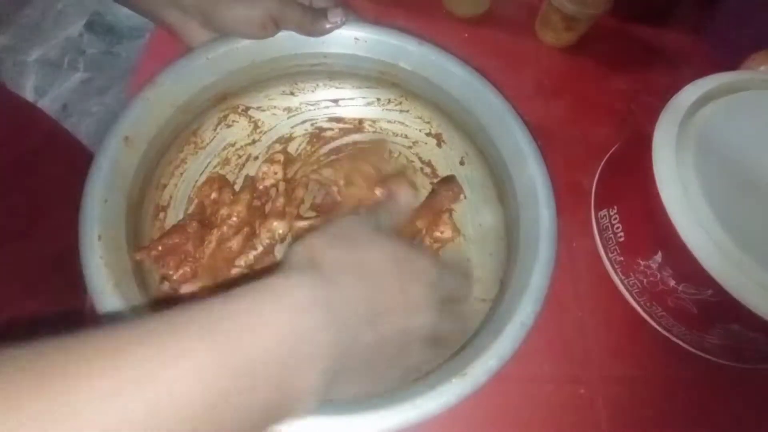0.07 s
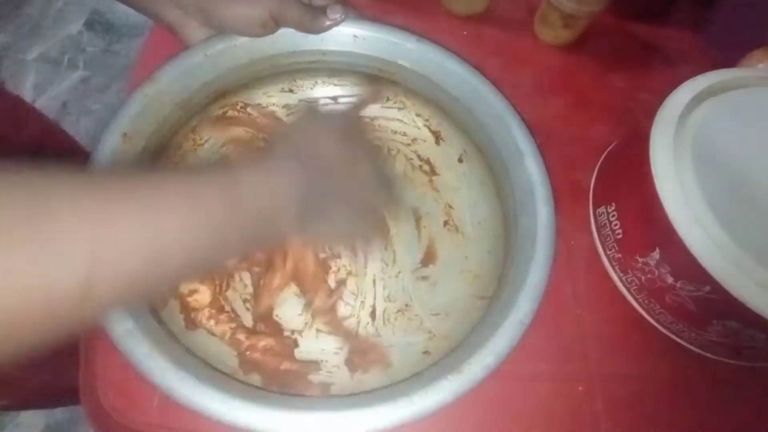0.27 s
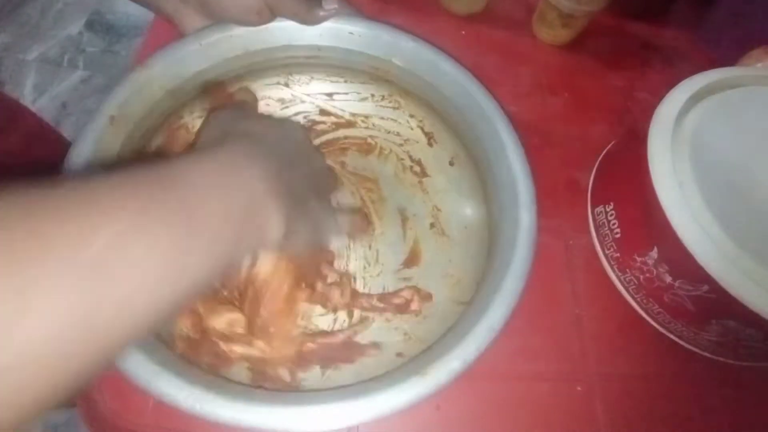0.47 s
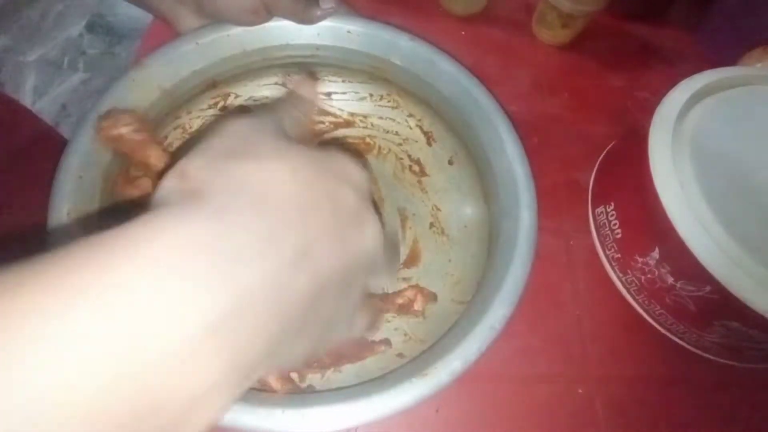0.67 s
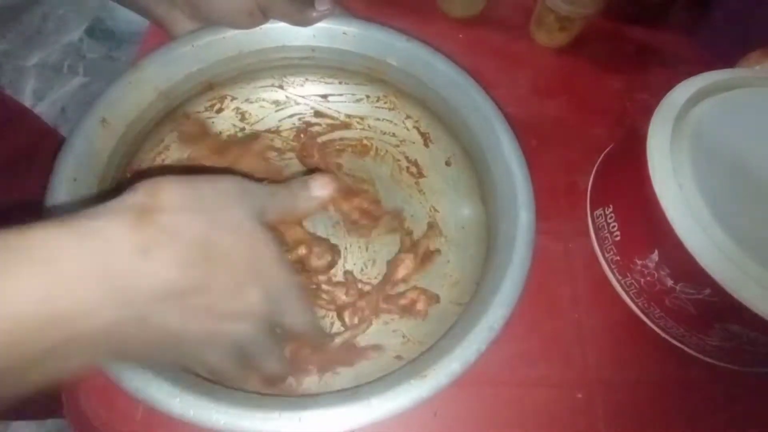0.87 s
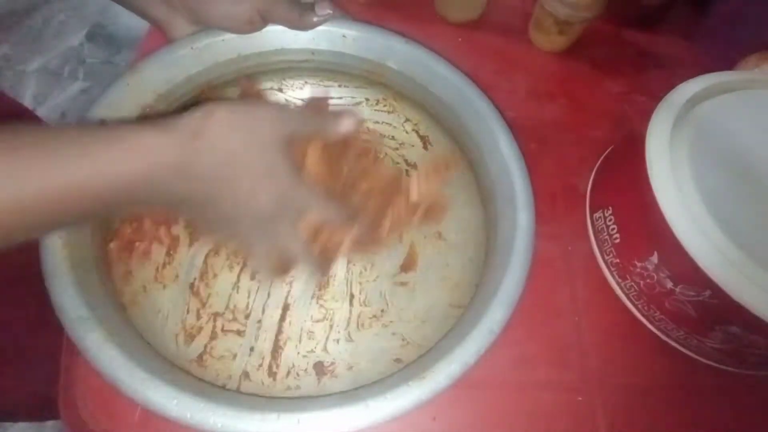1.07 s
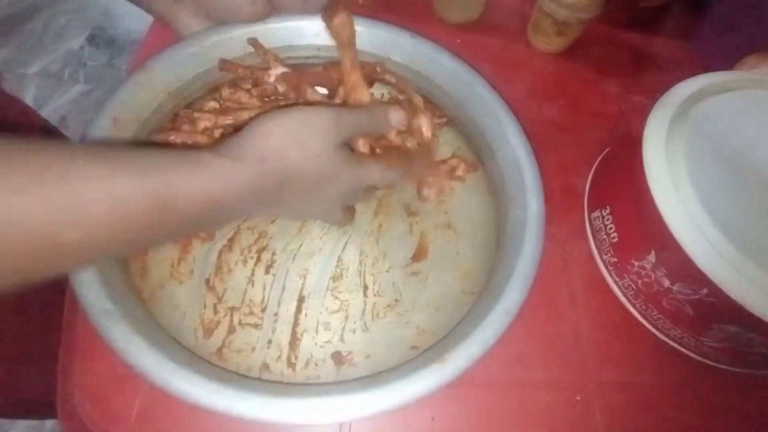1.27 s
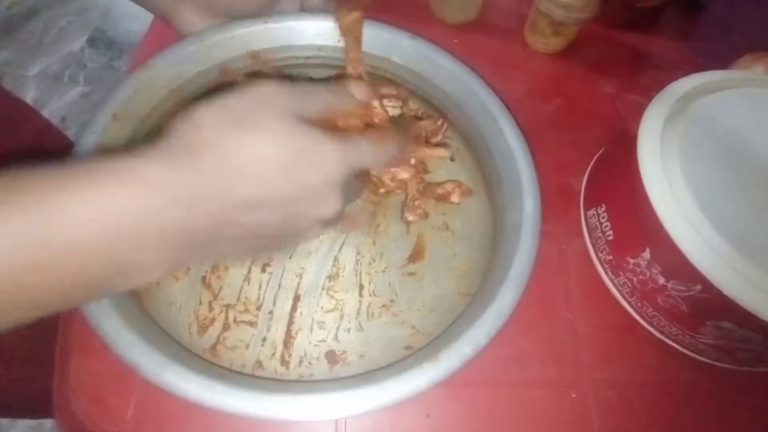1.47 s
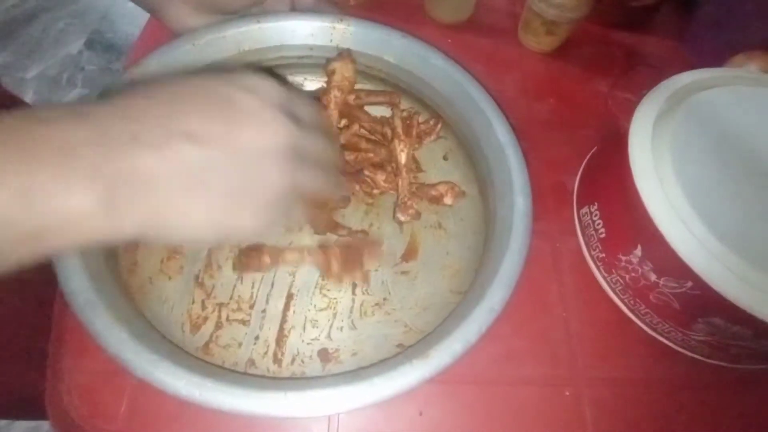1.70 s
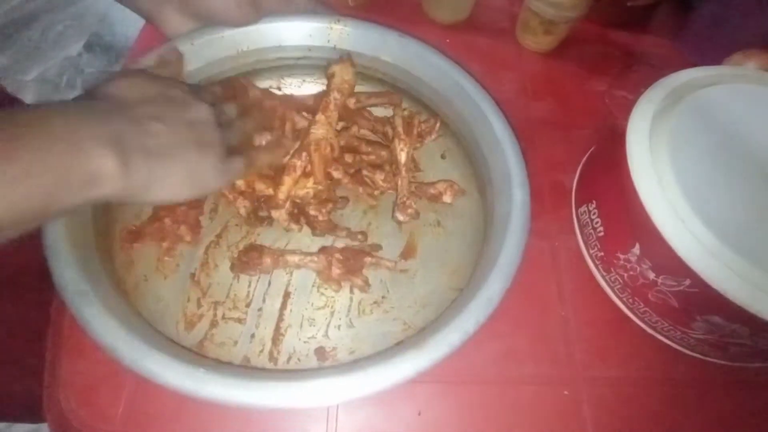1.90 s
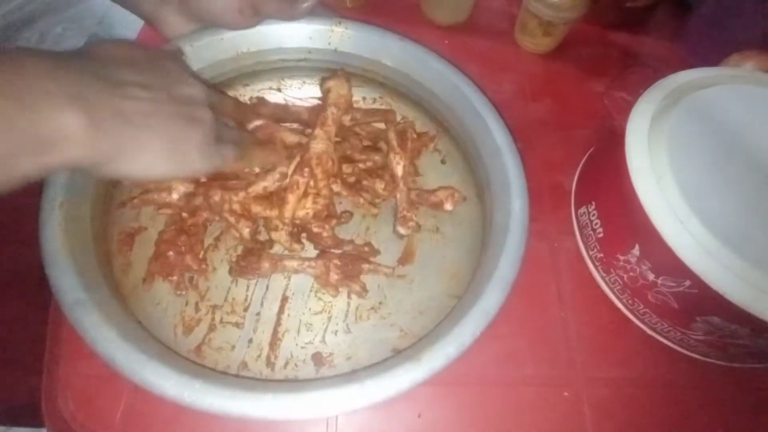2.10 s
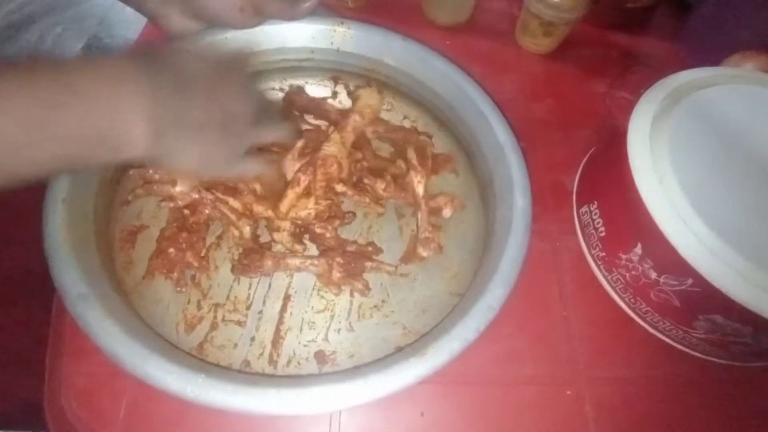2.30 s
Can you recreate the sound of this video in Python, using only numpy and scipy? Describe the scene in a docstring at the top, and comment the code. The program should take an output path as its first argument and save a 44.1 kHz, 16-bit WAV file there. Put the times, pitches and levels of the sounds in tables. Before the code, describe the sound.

Saucy chicken pieces squish and knock around a metal pan, with a few brief squeaks.

```python
"""A hand turns sauce-coated chicken feet in a wide aluminium pan on a plastic table.
First the wet pieces swish over the metal and knock against it, while the pan rocks and booms.
Just past one second its bottom catches and squeaks. After a lull come more knocks and booms,
then a drag across the table ends in a cluster of short squeaks and a last swish.
Throughout, a small, hard-walled kitchen rings after the knocks, swishes and squeaks."""
import sys
import numpy as np
from scipy import signal
from scipy.fft import rfft, irfft
from scipy.io import wavfile
from scipy.ndimage import uniform_filter1d

SR = 44100
rng = np.random.default_rng(int(sys.argv[2]) if len(sys.argv) > 2 else 0)


def store_pcm(level_fs):
    """Save levels as 16-bit WAV."""
    pcm = np.round(np.clip(level_fs, -1, 1) * 32767).astype(np.int16)
    wavfile.write(sys.argv[1], SR, np.atleast_2d(pcm).T)


N = 108045

# hits of food, hand and pan, levels relative to KNOCK_DB
# (time [s], contact [s], rim send [dB], room send [dB], level in each of the five bands [dB])
KNOCK_HITS = [(.257, 0.0058, 6, -1, -57, -58, -35.5, -41, -40.5),
              (0.3356, 0.0052, 6, 1.5, -41.5, -49.5, -31, -27.5, -27),
              (0.5465, 0.006, 9, -6.5, -39, -46.5, -43, -36.5, -47),
              (0.6272, 0.0021, -1.5, 1.5, -29, -35, -22.5, -35, -51),
              (.729, 0.003, -4, -1, -60, -34, -40, -48, -69),
              (0.7861, 0.00089, -8.5, -2, -24.5, -16.5, -37.5, -52.5, -46),
              (0.8225, 0.001, -1, 1.5, -50, -33, -64, -55, -46),
              (0.847, 0.0089, -14, 2.5, -48, -55, -54, -39, -69),
              (1.0317, 0.0014, -1.5, -2, -29, -20.5, -23.5, -28, -59),
              (1.394, 0.01, 7, 1, -75.5, -42, -50, -51.5, -62),
              (1.516, 0.014, 5, -0.5, -61, -41.5, -55, -56, -66.5),
              (1.592, 0.0009, -8, -1, -50, -31, -39.5, -71, -95),
              (1.6481, 0.0029, -17, -1.5, -45, -28, -26, -25.5, -39),
              (1.8919, 0.0057, 3.5, 5, -45.5, -53, -43.5, -41, -45.5),
              (2.027, 0.0023, -3, -3.5, -28.5, -49, -58, -74, -80),
              (2.1669, 0.002, -27, -5, -40.5, -30, -59.5, -59, -67),
              (2.2191, 0.001, -4, -3, -33, -34.5, -54, -35, -43)]
# EQ bands of a knock (low edge [Hz], high edge [Hz])
KNOCK_EQ_BANDS = [(100, 300), (300, 900), (900, 2000), (2000, 4500), (4500, 9000)]
# broad pan resonances that colour every knock (frequency [Hz], gain [dB])
PAN_EQ = [(100, 5), (140, 2), (240, -1), (400, 2), (600, 1.5), (780, -2.5), (980, 0.5), (1200, -5.5),
          (1500, 2), (1750, -3), (2400, 4.5), (3100, -2), (3750, 1.5), (4600, -1.5), (6500, 2), (7800, -3)]
# strokes through the sauce (start [s], peak [s], end [s], level [dB], tilt [dB/octave])
SAUCE_STROKES = [(0.084, 0.085, 0.15, -52.5, 7), (0.118, 0.157, 0.18, -40.5, -1.5),
                 (0.151, 0.233, 0.47, -40.5, 0), (0.267, 0.287, 0.32, -31, 8),
                 (0.308, 0.39, 0.74, -45.5, -0.5), (0.78, 0.933, 1.045, -46.5, 3.7),
                 (0.919, 1.045, 1.4, -41.5, 1.3), (1.137, 1.169, 1.177, -31.5, 1),
                 (1.145, 1.202, 1.346, -44, -2.5), (1.32, 1.413, 1.546, -47.5, -1.5),
                 (1.498, 1.545, 1.599, -59, 2.5), (1.644, 1.702, 1.796, -50.5, 1),
                 (1.897, 1.956, 2.136, -46.5, -1.5), (2.17, 2.204, 2.265, -38.5, 3),
                 (2.226, 2.298, 2.394, -49.5, 1)]
# colour of the wet swish (frequency [Hz], gain [dB])
SWISH_EQ = [(60, -17.5), (130, -9.5), (300, -1), (600, -2.5), (1000, -7.5), (1700, 1), (2700, 6),
            (4500, -2.5), (6500, -4), (7800, -14), (9300, -14), (11000, -27), (14000, -40), (15500, -25.5)]
# colour of a snapping sauce thread (frequency [Hz], gain [dB])
TICK_EQ = [(800, -10), (3000, -17), (7000, 10), (11000, 0.5), (15000, 4)]
# sauce lets go with a wet smack (time [s], level [dB])
SAUCE_SMACKS = [(.139, -48), (.16, -45), (0.293, -34), (.404, -46), (.67, -59), (.735, -56), (.965, -53),
                (1.143, -44), (1.727, -63), (1.968, -56)]
# the pan's bottom catches (start [s], peak [s], end [s], level [dB], main tone [Hz], upper tone [Hz])
SQUEAKS = [(1.1434, 1.1655, 1.186, -24.5, 2680, 3880), (2.18, 2.191, 2.198, -38.5, 2500, 3900),
           (2.196, 2.201, 2.207, -29.5, 2610, 4170), (2.205, 2.211, 2.238, -38, 4890, 5850),
           (2.2195, 2.2222, 2.227, -25, 2460, 3720)]
# resonances of the rasp under a squeak (frequency [Hz], width [Hz], gain [dB])
RASP_PEAKS = [(486, 87, -15), (924, 39, 3), (2520, 290, -4.5), (3840, 590, -2.5), (6640, 900, -10.5)]
# the pan rocks on the table (time [s], level relative to BUMP_DB [dB])
TABLE_BUMPS = [(0.142, -27), (0.274, -25.5), (0.331, -27.5), (0.633, -19.5), (0.791, -19.5), (0.952, -32.5),
               (1.041, -17), (1.595, -22), (1.731, -22), (1.91, -18), (2.03, -25), (2.214, -24.5)]
# fader curve of the dragged pan's rumble (time [s], gain [dB])
DRAG_FADER = [(0, -51), (.2, -61), (.42, -48), (0.549, -68.5), (.8, -48), (1.151, -47), (1.28, -65.5),
              (1.56, -80.5), (1.62, -58), (1.76, -60), (1.86, -61), (2.1, -43), (2.28, -51), (2.36, -60)]
# modes of the pan's bottom on the table (frequency [Hz], gain [dB], t60 [s])
BOTTOM_MODES = [(74, -12, .45), (95, -9, .45), (137.5, 1, .42), (153, -5, .25), (195, -8, .4),
                (302, -10, .45), (371, -16, .4)]
# modes of the pan's wall and rim, hollow to thin and bright (frequency [Hz], gain [dB], t60 [s])
RIM_MODES = [(458, -4, .4), (549, -6, .6), (610, 0, .6), (834, -9, .6), (931, 1, .6), (1223, -7, .4),
             (1546, 0, .45), (1830, -7, .45), (2402, 4, .65), (2794, -3, .3), (2993, -9, .6),
             (3801, -11, .45), (6227, -12, .35)]
# kitchen reverb tail (frequency [Hz], t60 [s], gain [dB])
REVERB_BANDS = [(85, 1, -7), (199, 0.32, -1), (530, 0.6, 0.5), (1360, 0.64, -4.5), (2980, 0.54, -6.5),
                (7000, 0.53, -7), (11100, 0.18, -31)]
# colour of the room tone (frequency [Hz], gain [dB])
ROOM_TONE_EQ = [(30, -53), (70, -27), (125, -4.5), (250, -12), (550, -6), (800, -27), (1200, -17.5),
                (2500, -16), (5000, -27.5), (10000, -45), (16000, -56)]

KNOCK_DB, RATTLE_GAIN, ATTACK_S, BASS_ROLLOFF_DB, TOP_ROLLOFF_DB = -22, 1.63, .0008, -35.5, -21.5
STROKE_EDGE_DB, GRAINS_PER_S, GRAIN_SPREAD_DB, HISS_GAIN = 17.5, 2000, 2, 0.54
STICK_DB, STICKS_PER_S = 3, 83
TICKS_PER_S, TICK_DB, TICK_SPREAD_DB = 200, -24, .8
SMACK_RISE_S, SMACK_FALL_S = 0.0015, 0.0044
SCRAPE_EDGE_DB, SLIPS_PER_S, RASP_TOP_HZ, RASP_DB = 16, 2100, 6440, -3.5
UPPER_TONE_DB, WAVER_DEPTH, WAVERS_PER_S, SQUEAK_ROUGH_DB = -6, 0.027, 650, 2
BUMP_DB, BUMP_PUSH_S, JUDDER_TOP_HZ = -16.5, 0.00482, 270
BOTTOM_DB, RIM_DB, SAUCE_TO_RIM_DB = -51.5, -53, -18
EARLY_DB, EARLY_DECAY_S, PREDELAY_S, ROOM_TONE_DB = -5, 0.014, 0.00237, -59
LOW_CUT_HZ, HIGH_CUT_HZ = 72.4, 15900


def knocks():
    """Each hit is a push and a brief rattle; returns the dry hits, the room send and the rim send."""
    hits, room_send, rim_send = np.zeros((3, N))
    t = np.arange(SR // 16) / SR
    low, high = np.array(KNOCK_EQ_BANDS, float).T
    centres, pan = np.sqrt(low * high), colour(PAN_EQ)
    for time, contact, rim_db, room_db, *band_db in KNOCK_HITS:
        push = rng.standard_normal(len(t)) * np.minimum(t / ATTACK_S, 1)
        push *= np.exp(-(t / contact) ** 2 / 2)
        push *= RATTLE_GAIN * contact / 0.0019 / np.linalg.norm(push)  # longer contact, more rattle
        push[int(ATTACK_S * SR)] += 1  # the clean transient
        db = np.array(band_db) - 10 * np.log10((high - low) / (SR / 2))  # spread over each band's width
        body = colour([(40, db[0] + BASS_ROLLOFF_DB), *zip(centres, db),
                       (13000, db[-1] + TOP_ROLLOFF_DB)])
        blow = convolve(push, body)
        blow *= undb(KNOCK_DB) * np.sqrt(SR) * np.linalg.norm(body) / np.linalg.norm(blow)
        hit = convolve(blow, pan)
        add(hits, time, hit)
        add(room_send, time, hit * undb(room_db))
        add(rim_send, time, body * np.sqrt(SR) * undb(KNOCK_DB + rim_db))
    return hits, room_send, rim_send


def swish():
    """Sauce films part in countless small clicks as the pieces stick and slide; threads snap on top."""
    wet = grains(GRAINS_PER_S, GRAIN_SPREAD_DB) + HISS_GAIN * rng.standard_normal(N)
    wet *= undb(STICK_DB * wander(STICKS_PER_S))
    ticks = undb(TICK_DB) * unit(convolve(grains(TICKS_PER_S, TICK_SPREAD_DB), colour(TICK_EQ)))
    out = np.zeros(N)
    for start, peak, end, db, tilt in SAUCE_STROKES:
        eq = colour([(hz, gain + tilt * np.log2(hz / 2500)) for hz, gain in SWISH_EQ])
        out += undb(db) * swell(start, peak, end, STROKE_EDGE_DB) * (unit(convolve(wet, eq)) + ticks)
    return out


def smacks():
    """Short, bright crackles where a piece pulls free of the sauce."""
    crackle = unit(convolve(grains(GRAINS_PER_S, GRAIN_SPREAD_DB), colour(TICK_EQ)))
    return crackle * sum(undb(db) * swell(time - SMACK_RISE_S, time, time + SMACK_FALL_S, STROKE_EDGE_DB)
                         for time, db in SAUCE_SMACKS)


def scrapes():
    """Each slide locks onto two tones of the pan, over a rasp of stick-slip clicks."""
    slips = grains(SLIPS_PER_S, GRAIN_SPREAD_DB) + rng.standard_normal(N)
    rasp = sum(undb(db) * signal.lfilter(*signal.iirpeak(hz, hz / width, fs=SR), slips)
               for hz, width, db in RASP_PEAKS)
    rasp = undb(RASP_DB) * unit(lowpass(rasp, 4, RASP_TOP_HZ))
    out = np.zeros(N)
    for start, peak, end, db, hz, upper_hz in SQUEAKS:
        tones = squeak(hz) + undb(UPPER_TONE_DB) * squeak(upper_hz)
        out += undb(db) * swell(start, peak, end, SCRAPE_EDGE_DB) * unit(tones + rasp)
    return out


def squeak(hz):
    """A friction tone, unsteady in pitch and level."""
    pitch = hz * (1 + WAVER_DEPTH * wander(WAVERS_PER_S))
    phase = 2 * np.pi * np.cumsum(pitch) / SR
    return unit(np.sin(phase) * undb(SQUEAK_ROUGH_DB * wander(WAVERS_PER_S)))


def bumps():
    """Soft pushes on the table make the pan's bottom boom."""
    pushes, push = np.zeros(N), np.hanning(int(BUMP_PUSH_S * SR))
    for time, db in TABLE_BUMPS:
        add(pushes, time, undb(db + BUMP_DB) * push / push.sum())
    return convolve(pushes, ring(BOTTOM_MODES))


def rumble():
    """The pan judders as the hand drags it on the table."""
    times, db = np.array(DRAG_FADER).T
    fader = undb(np.interp(np.arange(N) / SR, times, db))
    judder = lowpass(rng.standard_normal(N), 2, JUDDER_TOP_HZ)
    body = ring(BOTTOM_MODES)
    return convolve(fader * judder, body / np.linalg.norm(body))


def kitchen(send):
    """Hard walls return close reflections and a diffuse tail with its own decay in each band."""
    t = np.arange(SR) / SR
    spectrum, log_f = rfft(rng.standard_normal(SR)), np.log(np.arange(SR // 2 + 1) + 1)
    centres = np.array(REVERB_BANDS)[:, 0]
    response = rng.standard_normal(SR) * np.exp(-t / EARLY_DECAY_S) * (t > PREDELAY_S)
    response *= undb(EARLY_DB) / np.linalg.norm(response)
    for share, (_, t60, db) in zip(np.eye(len(REVERB_BANDS)), REVERB_BANDS):
        band = irfft(spectrum * np.interp(log_f, np.log(centres), share))
        fade = np.exp(-np.log(1000) * t / t60) * (t > PREDELAY_S)
        response += undb(db) * band * fade / np.linalg.norm(fade)
    return convolve(send, response)


def room_tone():
    """A faint, steady bed of dark noise."""
    return undb(ROOM_TONE_DB) * unit(convolve(rng.standard_normal(N), colour(ROOM_TONE_EQ)))


def undb(db):
    """Decibels to gain."""
    return 10 ** (np.asarray(db) / 20)


def unit(x):
    """Scale to rms 1."""
    return x / np.sqrt(np.mean(x ** 2))


def convolve(x, response):
    """Play a sound through a response."""
    return signal.fftconvolve(x, response)[:N]


def lowpass(x, order, hz):
    """Roll off the top."""
    return signal.sosfilt(signal.butter(order, hz, fs=SR, output="sos"), x)


def add(out, time, x):
    """Mix a sound in at a time."""
    i = max(int(time * SR), 0)
    out[i:i + len(x)] += x[:len(out[i:])]


def colour(points, size=4096):
    """Minimum-phase EQ response through points of (frequency [Hz], gain [dB])."""
    hz, db = np.array(points, float).T
    f = np.maximum(np.fft.rfftfreq(size, 1 / SR), 1)
    cepstrum = irfft(np.log(undb(np.interp(np.log(f), np.log(hz), db))))
    cepstrum[1:size // 2] *= 2
    cepstrum[size // 2 + 1:] = 0
    return irfft(np.exp(rfft(cepstrum)))


def ring(modes):
    """Decaying sines of a struck body."""
    t = np.arange(SR) / SR
    return sum(undb(db) * np.sin(2 * np.pi * hz * t) * np.exp(-np.log(1000) * t / t60)
               for hz, db, t60 in modes)


def grains(rate, spread_db):
    """Random tiny clicks, a few louder than the rest."""
    fires = rng.random(N) < rate / SR
    size = np.minimum(rng.exponential(size=N), 4)
    return unit(fires * undb(spread_db * size) * rng.choice([-1, 1], N))


def swell(start, peak, end, edge_db):
    """Fade up to a peak and down again, straight in dB, inside a soft gate."""
    t = np.arange(N) / SR
    gate = uniform_filter1d(1. * ((t > start) & (t < end)), size=128)
    return undb(np.interp(t, [start, peak, end], [-edge_db, 0, -edge_db])) * gate


def wander(rate):
    """Smooth random modulation of rms 1."""
    return unit(np.interp(np.arange(N) * rate / SR, np.arange(N), rng.standard_normal(N)))


def scene():
    """The mix: food sets the pan's rim and bottom ringing, with kitchen reverb over room tone."""
    hits, room_send, rim_send = knocks()
    sauce = swish() + smacks()
    rubbing = sauce + scrapes()
    rim = undb(RIM_DB) * convolve(rim_send + undb(SAUCE_TO_RIM_DB) * sauce, ring(RIM_MODES))
    bottom = undb(BOTTOM_DB) * convolve(hits + rubbing, ring(BOTTOM_MODES))
    ambience = room_tone() + kitchen(room_send + rubbing)
    return (hits + rubbing + rim + bottom + bumps() + rumble() + ambience)[None]


def record(dry):
    """A low cut and a steep high cut trim the deep bass and the very top."""
    thin = signal.sosfilt(signal.butter(3, LOW_CUT_HZ, "high", fs=SR, output="sos"), dry)
    return signal.sosfilt(signal.ellip(8, .2, 70, HIGH_CUT_HZ, fs=SR, output="sos"), thin)


dry = scene()
out = record(dry)
store_pcm(out)
```